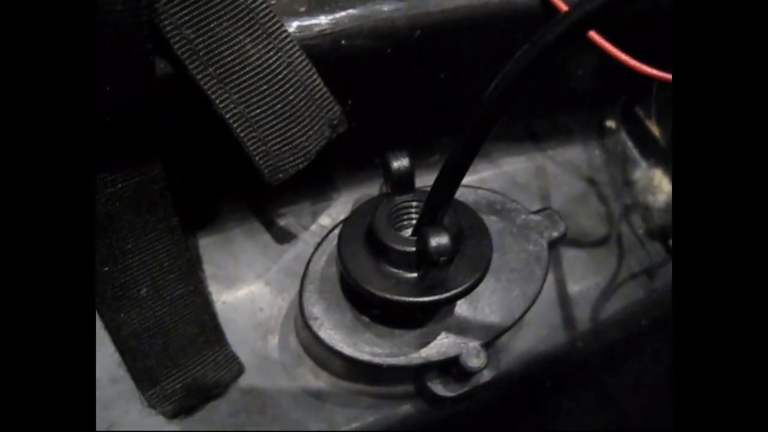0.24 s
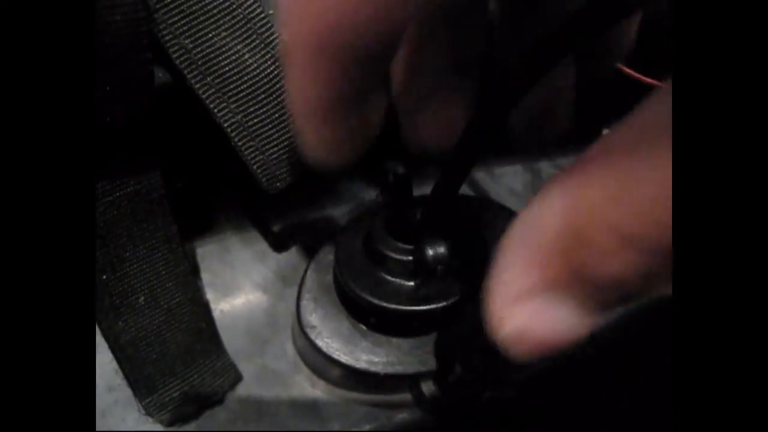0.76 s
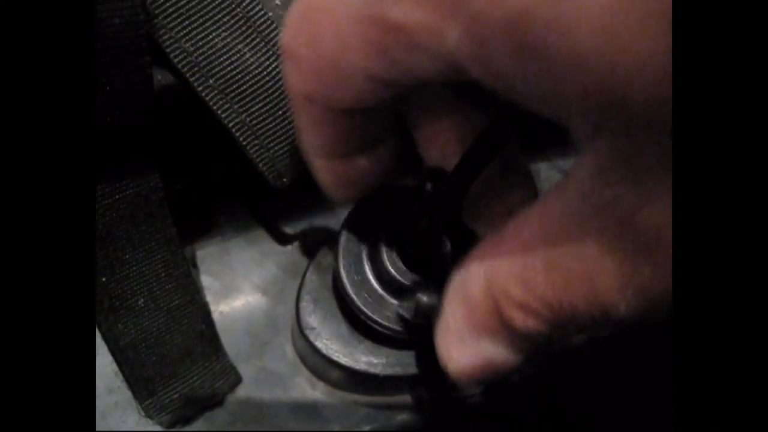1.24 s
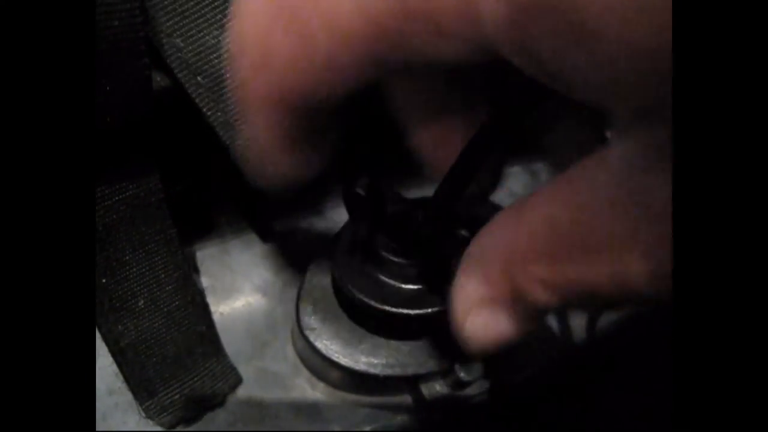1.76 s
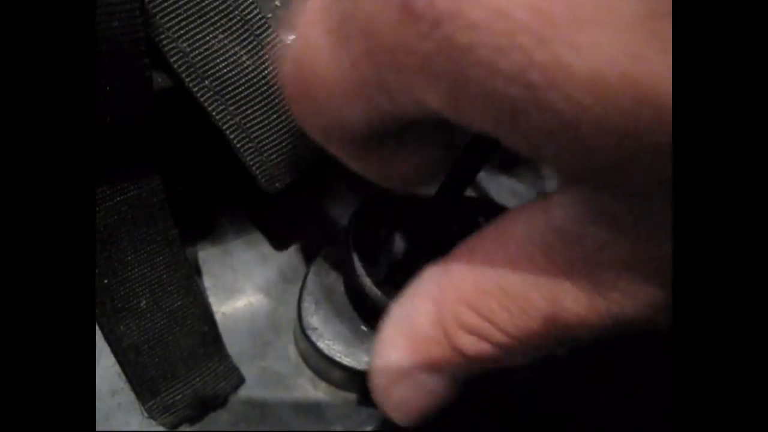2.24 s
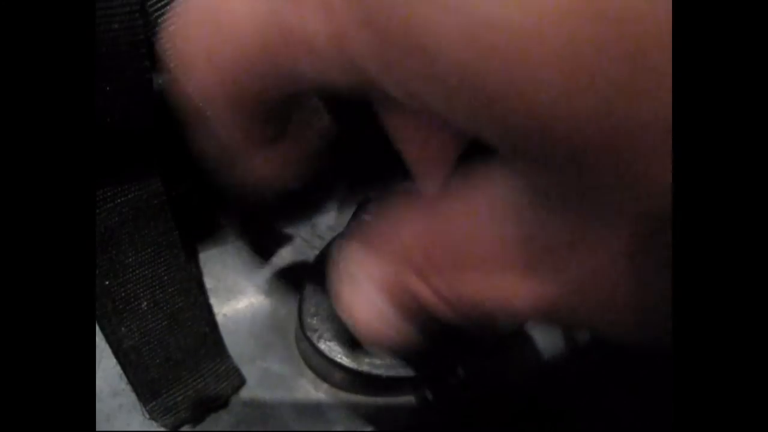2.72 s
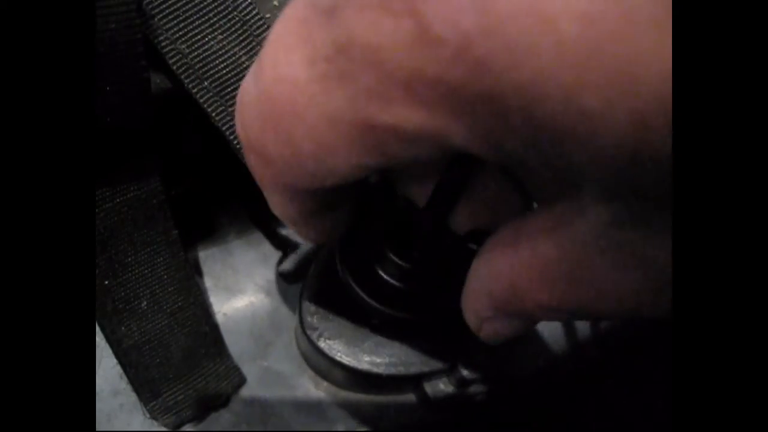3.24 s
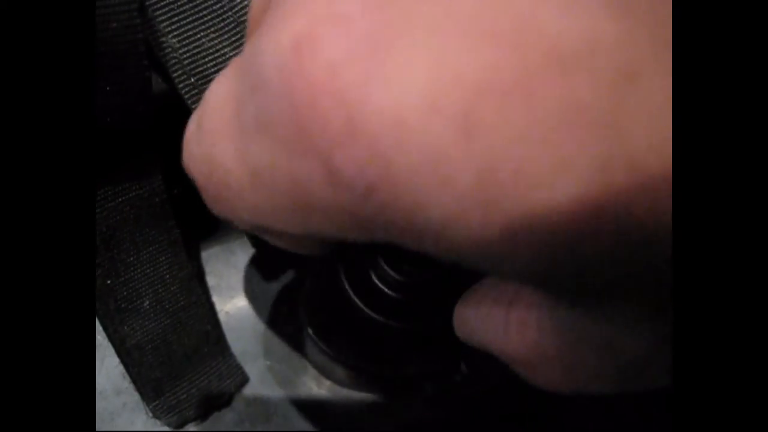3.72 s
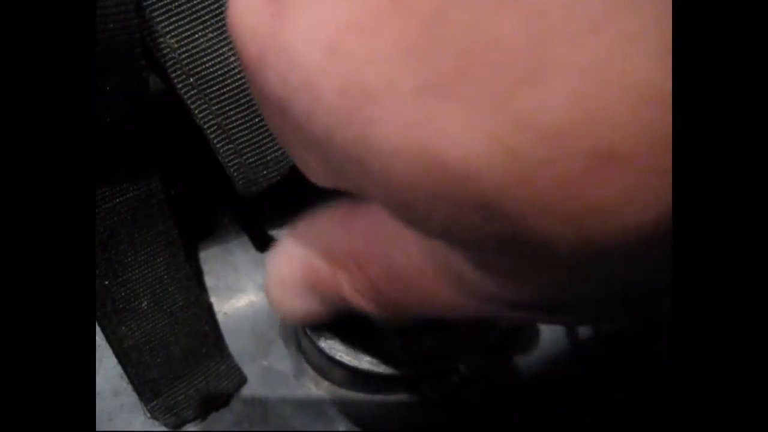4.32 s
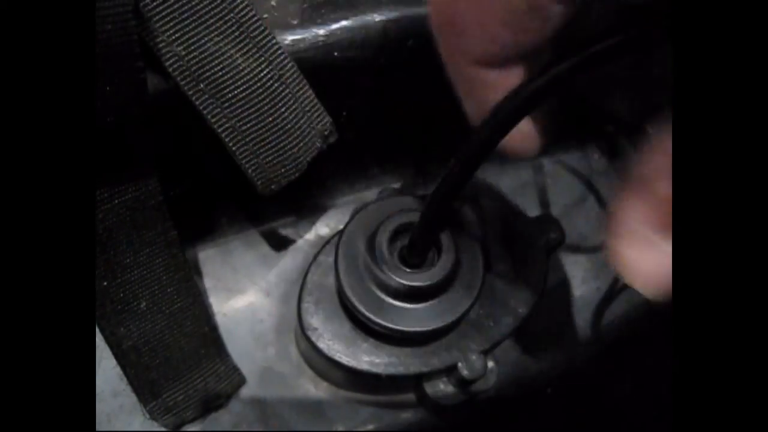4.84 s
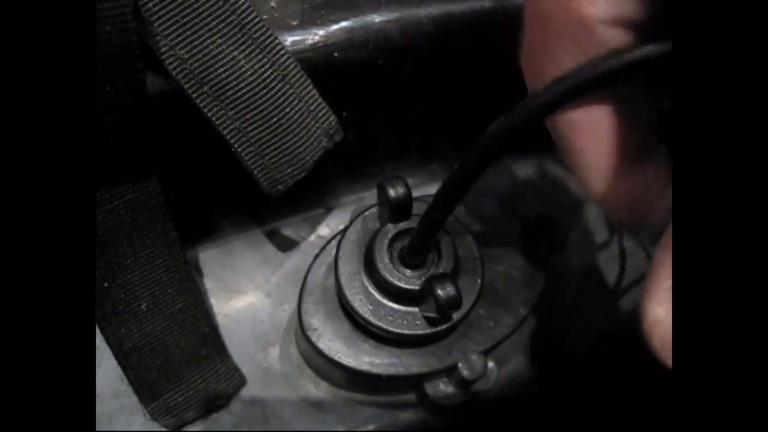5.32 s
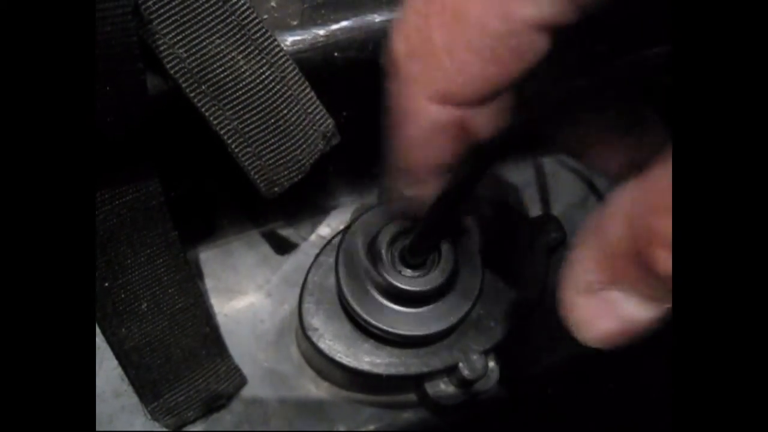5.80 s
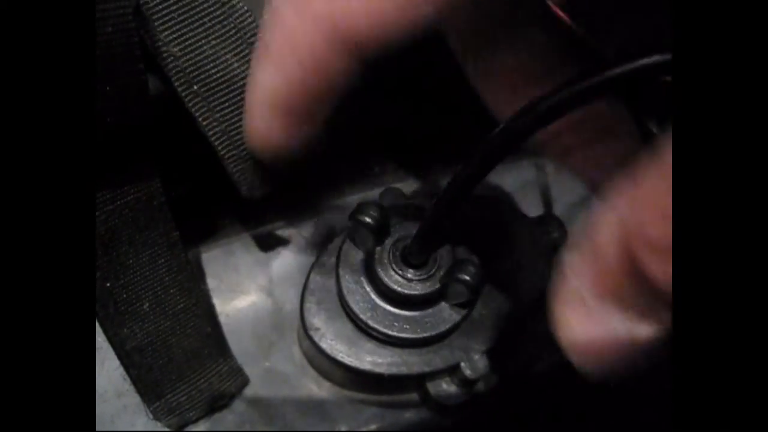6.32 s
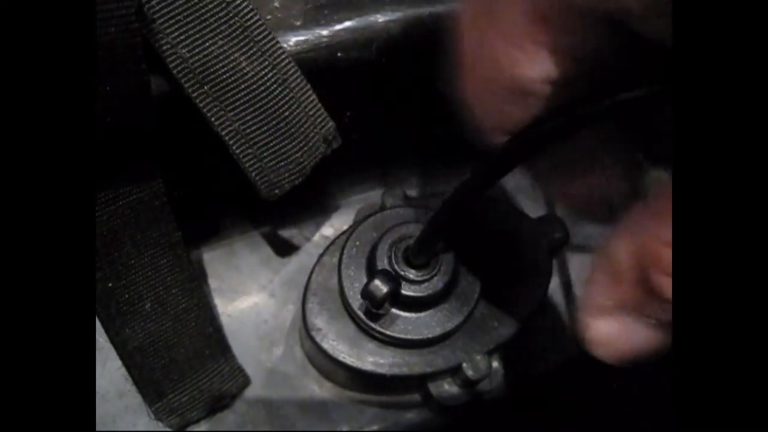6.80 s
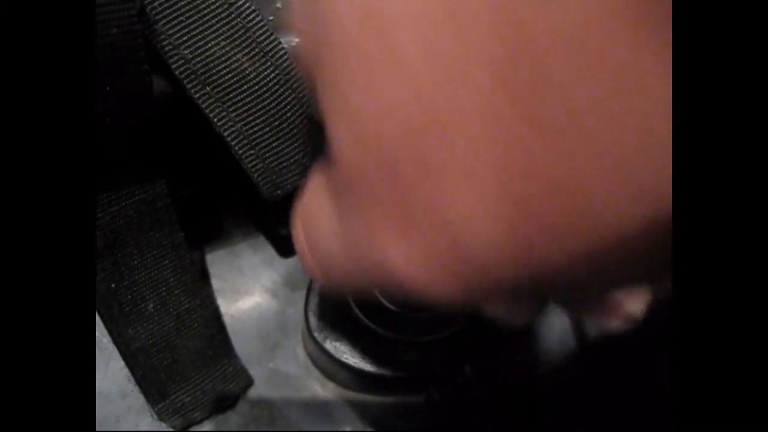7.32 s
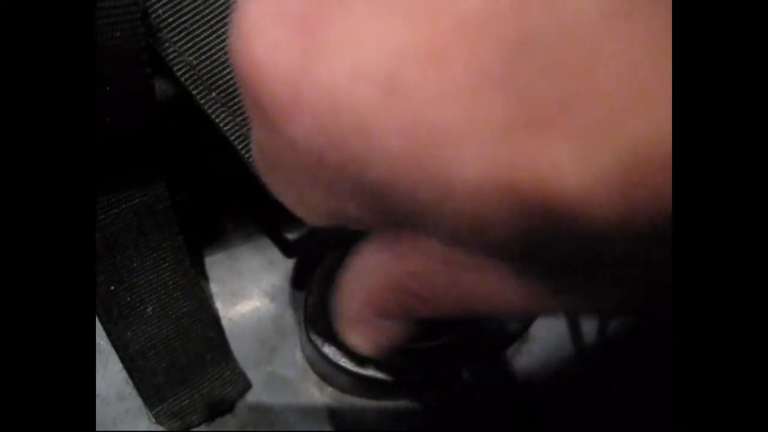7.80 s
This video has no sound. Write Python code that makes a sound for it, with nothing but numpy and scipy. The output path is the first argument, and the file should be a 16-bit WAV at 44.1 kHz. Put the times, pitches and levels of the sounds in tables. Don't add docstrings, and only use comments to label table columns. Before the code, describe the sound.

Close-up hand-tightening of a plastic nut: skin brushes, bursts of raspy thread whirr, sharp clacks, hollow panel taps and tiny squeals.

```python
import sys
import numpy as np
from scipy import signal
from scipy.fft import rfft, irfft
from scipy.io import wavfile
from scipy.ndimage import uniform_filter1d

SR = 44100
rng = np.random.default_rng(int(sys.argv[2]) if len(sys.argv) > 2 else 0)


def generate_wav(sig):
    pcm = np.round(np.clip(np.atleast_2d(sig).T, -1, 1) * 32767).astype(np.int16)
    wavfile.write(sys.argv[1], SR, pcm)


def to_linear_factor(level_db):
    exponent = np.asarray(level_db, float) / 20
    return 10 ** exponent


N = 355313
RING = 3072

# f/Hz, level/dB per Hz
HISS_COLOUR = [(15, -39), (25, 2.5), (118, -1.5), (2700, -15.5), (6900, -21.5), (7890, -21), (9520, -18.5),
               (15000, -29)]
HISS_DB = -49.5

# f/Hz, width/Hz, level/dB
BELLY_MODES = [(103, 30, -12), (150, 39, 1.5), (271, 34, 5.5)]
HULL_MODES = [(285.6, 20, -16.5), (355, 36, -3.5), (411, 27.5, 1), (600.3, 64, -5.5)]
NUT_MODES = [(773, 59, -7.5), (927, 144, -3.5), (1126, 24, -13.5), (1296, 93, -4.5), (1398, 145, 1),
             (1679, 175, -3.5), (2063, 195, -5), (2270, 250, -10), (2760, 1100, -16), (3600, 1100, -17),
             (4630, 1300, -21)]
CRACK_MODES = [(2630, 1460, 3), (3560, 1420, 3), (4210, 980, 4), (4940, 1160, 2), (5950, 900, -3),
               (6840, 560, -6), (7430, 800, -5.5)]
TOP_MODES = [(9174, 1140, 15), (9240, 2270, 15.5), (11000, 890, 6.5), (11350, 550, 5), (12980, 1700, -4),
             (14100, 650, -32)]
THREAD_MODES = [(8820, 140, -4), (9700, 680, -0.5), (12000, 320, -1.5), (12500, 260, -3.5)]

# t/s, peak level/dB
THUMPS = [
    (0.871, -34),
    (3.728, -42),
    (5.013, -27),
    (5.266, -27),
    (5.579, -30),
    (6.076, -28.5),
    (6.39, -32),
    (6.647, -26.5),
    (6.823, -42),
]
# t/s, top peak level/dB, crack peak level/dB
TICKS = [(0.105, -29, -42), (0.24, -27, -41), (0.344, -35, -37), (1.191, -14.5, -33), (1.83, -15, -34),
         (2.254, -29, -50), (4.9548, -22, -29), (4.9684, -20, -29), (4.9793, -28, -29), (4.998, -21, -24),
         (5.4847, -24, -34), (5.8, -30, -33), (6.57, -4, -20), (7.1636, -25, -50), (7.194, -29, -32.5),
         (7.587, -35, -28), (7.5943, -28, -28), (7.636, -28, -36), (5.705, -29, -39), (4.707, -22, -30),
         (4.991, -28, -30), (5.26, -32, -28), (1.972, -30, -41), (7.609, -41, -44), (6.056, -40, -36),
         (6.369, -29, -30), (7.444, -34, -36), (3.684, -20, -26), (3.706, -30, -34), (3.733, -33, -28),
         (3.844, -37, -46), (4.546, -16, -27), (4.572, -20, -34), (4.611, -26, -36), (2.754, -16, -33),
         (5.474, -36, -43), (6.8, -21, -25.5), (.268, -30, -36), (0.13, -37, -48), (6.834, -24, -19)]
# t/s, length/s, f/Hz, peak level/dB
SQUEALS = [
    (.244, 0.031, 2230, -27.5),
    (6.78, .017, 4900, -21),
    (6.781, 0.016, 9300, -14),
    (3.167, .005, 11600, -9),
    (7.507, 0.023, 5320, -12),
    (7.503, 0.031, 2900, -17.5),
]

# t/s, length/s, rasp level/dB, nut level/dB, hull level/dB
WHIRRS = [(1.068, .055, -41, -33, -26), (1.128, 0.027, -39, -40, -32), (1.158, .03, -35, -22, -23.5),
          (1.2, 0.046, -45, -37, -31), (1.245, 0.08, -42.5, -36, -31), (1.411, 0.058, -45.5, -57, -31.5),
          (1.56, 0.071, -47, -30.5, -27), (1.632, 0.018, -34, -36, -24), (2.238, 0.017, -38, -30, -36),
          (4.748, 0.055, -44, -20.5, -22.5), (4.795, 0.028, -37, -32, -21.5),
          (4.826, 0.028, -41.5, -29, -27), (4.853, 0.033, -43, -30.5, -21), (4.888, 0.065, -46, -32, -27),
          (2.61, 0.035, -48, -55, -49), (1.92, 0.29, -47.5, -44.5, -38.5), (2.195, 0.085, -59, -37, -29),
          (2.85, 0.028, -39, -27, -30), (2.88, 0.054, -46.5, -39, -27.5), (2.926, 0.166, -53, -55, -44),
          (3.067, 0.033, -46, -30, -25), (3.165, 0.032, -47, -52, -32.5), (3.291, 0.081, -45, -49, -45.5),
          (4.302, 0.044, -42, -40.5, -43.5), (4.545, 0.031, -32.5, -40, -43), (4.718, 0.044, -50, -38, -28),
          (5.829, 0.027, -46, -32, -21.5), (6.125, 0.037, -23.5, -17.5, -27.5)]
# t/s, length/s, rasp level/dB, nut level/dB, hull level/dB
BINDS = [(1.856, 0.057, -41, -30.5, -23.5), (2.305, 0.022, -35, -21.5, -20), (2.832, 0.024, -38, -49, -33),
         (2.338, 0.024, -51, -34, -27), (2.387, 0.23, -53, -43, -38.5), (6.392, 0.0085, -12, -24, -24),
         (2.618, 0.11, -53, -50, -46), (4.4, 0.046, -38, -40.5, -36), (5.021, 0.081, -42, -28, -31),
         (5.272, 0.018, -19, -23, -17), (5.52, 0.023, -18, -32, -34), (5.545, 0.077, -54, -43.5, -39),
         (6.387, 0.036, -43, -45, -25.5), (7.17, 0.071, -38.5, -40.5, -43), (7.503, 0.024, -20, -35, -59)]
# t/s, length/s, rasp level/dB, nut level/dB, hull level/dB
BRUSHES = [(0.104, 0.054, -51, -52, -53), (0.152, 0.12, -47, -52.5, -60), (0.263, 0.022, -34, -41, -48),
           (0.866, 0.14, -41.5, -32.5, -30.5), (1.74, 0.071, -37, -42, -44.5),
           (2.713, 0.056, -35, -36.5, -28.5), (3.607, 0.039, -37, -38, -39),
           (3.638, 0.023, -27.5, -33, -38), (3.666, 0.05, -39, -38.5, -33.5),
           (5.944, 0.027, -48.5, -51, -42), (3.713, 0.065, -48, -37.5, -36), (4.577, 0.04, -46, -40, -44.5),
           (5.098, 0.041, -43.5, -33.5, -38), (5.185, 0.024, -41, -28, -36),
           (5.209, 0.05, -33, -32.5, -35.5), (5.3, 0.076, -43, -35, -39), (5.785, 0.026, -35.5, -27, -27.5),
           (5.8, 0.027, -31.5, -18.5, -20), (6.029, 0.035, -35.5, -37, -40), (7.244, 0.14, -41, -34, -31),
           (6.162, 0.083, -38, -24, -22.5), (6.3, 0.052, -32, -37.5, -44), (6.362, 0.021, -30, -32, -37),
           (6.428, 0.12, -44.5, -40.5, -46.5), (6.601, .016, -33, -40, -48), (6.618, .026, -43.5, -46, -46),
           (6.729, 0.073, -35, -31, -30), (7.022, 0.07, -38.5, -38.5, -43), (7.44, 0.11, -39.5, -37.5, -47),
           (7.54, 0.071, -34, -33, -34.5), (7.771, .025, -40.5, -29, -31.5), (7.793, 0.021, -24, -21, -25),
           (7.815, .09, -43, -37.5, -35), (7.902, 0.08, -40, -34, -36), (8.015, .05, -46, -48, -43)]
# t/s, length/s, nut level/dB, hull level/dB
ROLLS = [(0.99, 0.14, -48, -41), (1.485, 0.074, -43, -39.5), (1.684, 0.028, -52, -42),
         (2.779, 0.05, -44, -36.5), (3.106, 0.045, -46, -33), (3.201, 0.067, -50, -46),
         (3.372, 0.42, -57.5, -53.5), (3.78, 0.36, -58, -56), (3.986, 0.13, -48.5, -44.5),
         (4.063, 0.073, -43, -38), (4.14, 0.061, -57, -52), (4.188, 0.04, -45, -47),
         (4.23, 0.093, -48, -45), (2.693, 0.027, -40, -35), (4.334, 0.051, -47.5, -45),
         (4.445, 0.11, -50, -39), (4.949, 0.067, -38.5, -31), (5.676, 0.065, -50, -58),
         (5.749, 0.05, -41, -39), (5.852, 0.046, -43, -37), (5.9, 0.064, -39, -42),
         (6.089, 0.045, -36, -27), (6.655, 0.039, -38, -34), (6.697, 0.038, -40, -35),
         (6.802, 0.036, -42, -36), (6.835, 0.054, -38, -40), (0.15, 0.026, -43, -44),
         (7.09, 0.096, -50, -51), (7.381, 0.069, -44.5, -43), (7.614, 0.12, -44.5, -39.5),
         (7.972, 0.04, -45, -38), (0.986, 0.016, -49, -48), (2.361, 0.028, -55, -53)]
# t/s, length/s, nut level/dB, hull level/dB
COASTS = [(0.293, .57, -65.5, -78), (1.32, 0.14, -53.5, -46), (1.654, 0.025, -39, -31),
          (1.823, 0.05, -65, -50), (2.268, 0.028, -62, -33), (4.615, 0.042, -73, -59),
          (5.139, 0.037, -44, -51), (5.356, 0.19, -53.5, -53.5), (5.593, 0.051, -44, -37),
          (6.252, 0.075, -41.5, -42), (6.534, 0.05, -55, -72)]
# crack relative to rasp/dB, squeak f/Hz, fall of modes away from it/dB per kHz (negative = rise)
RUBS = [
    (-8, 12100, 5.5),
    (-10.5, 8400, 5),
    (-2, 10150, 6.5),
    (-1.5, 7800, -5),
    (5, 11300, 12),
]

# t/s, nut peak level/dB, hull level/dB, treble level/dB
KNOCKS = [(.875, -11, -18, -20), (.88, -9, -12, -27), (1.096, -18, -28, -35), (1.108, -19, -21.5, -34.5),
          (1.255, -11, -24.5, -28), (2.243, -24, -24, -48), (2.278, -29, -34, -47),
          (4.778, -17, -19, -32.5), (4.871, -24, -32, -40), (4.894, -21.5, -25, -37),
          (4.916, -20, -31, -48), (6.432, -4, -26.5, -32), (5.289, -16, -17.5, -31), (2.8, -23, -21, -39),
          (2.879, -29, -25.5, -43), (2.905, -24, -25.5, -48), (3.716, -22, -25, -45),
          (5.589, -16.5, -22.5, -28), (4.58, -24.5, -36, -33), (4.208, -32, -32, -55),
          (3.097, -26, -29, -54), (1.31, -23, -26, -65), (1.743, -23, -29, -17.5), (2.195, -22, -28, -55),
          (2.315, -19, -16.5, -35), (2.319, -3.5, -25, -53), (2.456, -21.5, -19, -58),
          (2.485, -25, -26, -56), (2.733, -8.5, -29, -33), (3.081, -23.5, -20, -57), (3.135, -14, -18, -51),
          (3.286, -31.5, -29, -57), (3.564, -33, -28.5, -58), (3.657, -16.5, -38, -22.5),
          (4.541, -23, -35, -29), (4.764, -15, -34, -31), (4.797, -9, -29, -36), (4.832, -29, -28, -35),
          (5.026, -1, -12, -12), (5.185, -2.5, -24, -6), (5.266, -10.5, -13, -22),
          (5.275, -5.5, -21, -17.5), (5.808, -6, -14.5, -24.5), (6.224, -6.5, -16.5, -36),
          (6.406, -4.5, -22, -20), (6.428, -6, -37, -9.5), (6.656, -2, -11.5, -20), (6.726, -9.5, -20, -52),
          (7.371, -16.5, -30, -47)]
# t/s, nut peak level/dB, hull level/dB, treble level/dB
SLAPS = [(.176, -28.5, -38, -19), (6.651, -13, -30, -26), (0.408, -35, -41.5, -44), (.916, -8, -35, -8),
         (0.953, -12, -16, -24.5), (1.212, -3, -17.5, -31), (1.246, -11.5, -22, -20),
         (1.262, -5, -13.5, -30), (1.413, -14, -25.5, -47), (2.209, -5.5, -16, -28),
         (2.537, -1.5, -14, -21), (2.716, -24, -19.5, -42), (3.754, -39, -43, -22),
         (4.5, -19.5, -21.5, -33.5), (4.710, -2, -19.5, -19), (5.014, -9, -13.5, -25),
         (5.063, -10, -18, -9), (5.088, -10.5, -20, -18), (5.329, -13.5, -30, -17),
         (5.577, -14.5, -20, -19), (6.126, -13, -14.5, -18), (6.17, -5.5, -41, -25), (6.83, -8, -23, -16.5),
         (7.004, -4.5, -38, -32.5), (7.007, -7, -25.5, -21), (6.079, -2.5, -12.5, -27.5)]
# t/s, nut peak level/dB, hull level/dB, treble level/dB
SNAPS = [(0.2887, -19.5, -55.5, -10.5), (1.071, -24, -26, -41), (1.157, -11.5, -39, -32),
         (1.463, -9, -19, -28), (1.879, -25, -38, -30), (2.263, -17, -36, -39), (2.399, -24, -21, -34),
         (2.422, -15, -18.5, -29), (2.59, -16, -20, -40), (2.848, -12.5, -21, -23),
         (2.859, -10.5, -19, -36), (3.166, -13, -29, -9.5), (3.642, -19, -47, -12.5),
         (4.421, -28, -22.5, -39), (5.748, -28.5, -28.5, -17.5), (5.943, -16, -29, -36),
         (6.077, -13, -28, -7), (6.148, -2.5, -24, -25), (6.372, -20.5, -30, -22),
         (6.765, -9.5, -27.5, -23), (7.498, -12, -19.5, -13), (7.803, -14.5, -29, -9),
         (7.952, -15, -28, -29)]
# crack relative to treble/dB, top relative to treble/dB, contact length/s
CONTACTS = [
    (0.9, 0.5, .0035),
    (1.44, -12.5, 0.0036),
    (-17, -2, .0038),
]


def by_kind(tables, rules):
    rows = []
    for table, rule in zip(tables, rules):
        rows += [(*row, *rule) for row in table]
    return np.transpose(rows)


def walk(rate):
    hold = int(SR / rate)
    steps = np.repeat(rng.standard_normal(N // 64), hold)[:N]
    level = uniform_filter1d(steps, hold)
    return level / level.std()


def rings(body):
    hz, width, db = np.transpose(body)[:, :, None]
    t = np.arange(RING) / SR
    decay = np.exp(-np.pi * width * t)
    modes = to_linear_factor(db) * np.sqrt(width) * decay * np.sin(2 * np.pi * hz * t)
    return signal.sosfilt(signal.butter(4, 0.76 * hz.min(), "high", fs=SR, output="sos"), modes)


def strike(starts, body, db, envelopes, scatter_db):
    modes, out = rings(body), np.zeros(N + 2 * RING)
    for start, level, shape in zip(starts, db, envelopes):
        mix = to_linear_factor(scatter_db * rng.standard_normal(len(modes))) * rng.choice([-1, 1], len(modes))
        force = shape * rng.standard_normal(RING)
        force[np.argmax(shape)] += 9.8 * shape.max()
        hit = signal.fftconvolve(force, mix @ modes)
        i = int(start * SR)
        out[i:i + len(hit)] += hit * to_linear_factor(level) / np.abs(hit).max()
    return out[:N]


def grit(patchy_db, gritty):
    ticks_per_s, tick_s = 420., 0.00031
    bites = to_linear_factor(1.32 * rng.exponential(size=N)) * (rng.random(N) < ticks_per_s / SR)
    bites = signal.lfilter([1], [1, -np.exp(-1 / (tick_s * SR))], bites)
    force = (1 + gritty * bites) * rng.standard_normal(N) * to_linear_factor(patchy_db * walk(40.))
    return force / force.std()


def slide(starts, lengths, body, db, force, slew, scatter_db, favour_db=0):
    swell_share = 0.34
    sag_db, release_s = 4.5, 0.0059
    release = np.exp(-np.arange(RING // 2) / SR / release_s)
    release = release / release.sum()
    scatter = scatter_db * rng.standard_normal((len(db), len(body)))
    mixes = to_linear_factor(scatter + favour_db) * (-1.) ** np.arange(len(body))
    out, force = np.zeros(N + 2 * RING), np.append(force, np.zeros(RING))
    for start, held, level, response in zip(starts, lengths, db, mixes @ rings(body)):
        edge = np.hanning(int(slew + swell_share * held * SR))
        shape = np.abs(signal.fftconvolve(np.ones(int(held * SR)), edge) / edge.sum()) ** 1.79
        shape = shape * to_linear_factor(sag_db * np.linspace(.5, -.5, len(shape)))
        shape = signal.fftconvolve(shape, release)
        i = int((start - release_s / 2) * SR) - len(edge) // 2
        push = force[i:i + len(shape)]
        response = response * to_linear_factor(level) / np.linalg.norm(response)
        sound = signal.fftconvolve(push * shape[:len(push)], response)[:len(out) - i]
        out[i:i + len(sound)] += sound
    return out[:N]


def hiss():
    hz, db = np.transpose(HISS_COLOUR)
    f = np.maximum(np.arange(N // 2 + 1) * SR / N, 1)
    colour = to_linear_factor(np.interp(np.log(f), np.log(hz), db))
    noise = irfft(rfft(rng.standard_normal(N)) * colour, N)
    rumble = signal.sosfilt(signal.butter(2, 90., fs=SR, output="sos"), noise)
    wander = to_linear_factor(1.3 * walk(2.24)) - 1
    return (noise + rumble * wander) * to_linear_factor(HISS_DB) / noise.std()


def thumps():
    start, peak = np.transpose(THUMPS)
    push = np.exp(-np.arange(RING) / SR / 0.033) * np.ones((len(start), 1))
    return strike(start, BELLY_MODES, peak + 4.0, push, 1.5)


def ticks():
    start, top, crack = np.transpose(TICKS)
    snap = np.exp(-(np.arange(RING) / SR / 0.0048) ** 2) * np.ones((len(start), 1))
    bright = strike(start, TOP_MODES, top + 0.31, snap, 5.6)
    return bright + strike(start, CRACK_MODES, crack + 6.6, snap, 10.0)


def squeals():
    t = np.arange(RING) / SR
    out = np.zeros(N)
    for start, length, hz, db in SQUEALS:
        out += strike([start], [(hz, 220., 0)], [db], [np.exp(-(t / length) ** 4)], 0)
    return out


def slides():
    rolls = [(s, n, -53.5 + 0.54 * (nut + 45), nut, hull) for s, n, nut, hull in ROLLS]
    coasts = [(s, n, -69, nut, hull) for s, n, nut, hull in COASTS]
    kinds = (WHIRRS, BINDS, BRUSHES, rolls, coasts)
    start, length, rasp_db, nut, hull, crack_db, squeak_hz, focus_db = by_kind(kinds, RUBS)
    drag, rasp = grit(1.6, 3.), grit(1.4, 1.)

    top_khz_away = np.abs(squeak_hz[:, None] - np.array(TOP_MODES)[:, 0]) / 1000
    near_db = -focus_db[:, None] * np.minimum(top_khz_away, 1.4)
    turning = len(WHIRRS) + len(BINDS)
    lean_db = -2.6 * np.abs(squeak_hz[:turning, None] - np.array(THREAD_MODES)[:, 0]) / 1000
    top_db = rasp_db - 3 * (np.arange(len(start)) < turning)

    whine = slide(start[:turning], length[:turning], THREAD_MODES, rasp_db[:turning] - 3.5,
                  rasp * to_linear_factor(4.4 * walk(25.)), slew=180, scatter_db=4.5, favour_db=lean_db)
    panel = slide(start, length, HULL_MODES, hull, drag * to_linear_factor(2.24 * walk(25.)), slew=500, scatter_db=1.5)
    ring = slide(start, length, NUT_MODES, nut, drag * to_linear_factor(1.64 * walk(25.)), slew=400, scatter_db=2.2)
    crackle = slide(start, length, CRACK_MODES, rasp_db + crack_db, 0.61 * (drag + rasp),
                    slew=400, scatter_db=2.2)
    bright = slide(start, length, TOP_MODES, top_db, rasp * to_linear_factor(1.7 * walk(14.)),
                   slew=300, scatter_db=1.5, favour_db=near_db)
    return whine + panel + ring + crackle + bright


def knocks():
    kinds = (KNOCKS, SLAPS, SNAPS)
    start, nut, hull, treble, crack_db, top_db, length = by_kind(kinds, CONTACTS)
    t = np.arange(RING) / SR / np.clip(length, .0003, .03)[:, None]

    def push(rise, quick, tail_db):
        fall = np.exp(-quick * t) + to_linear_factor(tail_db) * np.exp(-quick * t / 5.43)
        return (1 - np.exp(-(t / rise) ** 2)) * fall

    panel = strike(start, HULL_MODES, hull + 1.8, push(0.596, 0.81, -23.5), 2.85)
    ring = strike(start, NUT_MODES, nut + 0.21, push(0.291, 1.27, -12), 1.58)
    crack = strike(start, CRACK_MODES, treble + crack_db + 7.5, push(0.39, 1.8, -18.0), 3.3)
    top = strike(start, TOP_MODES, treble + top_db + 5.2, push(0.57, 2.3, -64), 1.2)
    return panel + ring + crack + top


def scene():
    return (hiss() + thumps() + ticks() + squeals() + slides() + knocks())[None]


def roll_off(x):
    return signal.sosfilt(signal.butter(12, 16640, fs=SR, output="sos"), x)


def record(dry):
    notch_hz, notch_width_hz, top_hz = 7890, 2350, 15250
    x = signal.lfilter(*signal.iirnotch(notch_hz, notch_hz / notch_width_hz, fs=SR), dry)
    clipped = np.clip(x, -.84, .84)
    mix = signal.sosfilt(signal.butter(12, top_hz, fs=SR, output="sos"), clipped)
    return roll_off(mix)


dry = scene()
out = record(dry)
generate_wav(out)
```